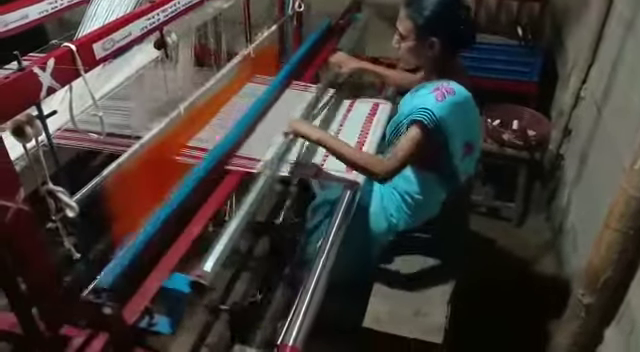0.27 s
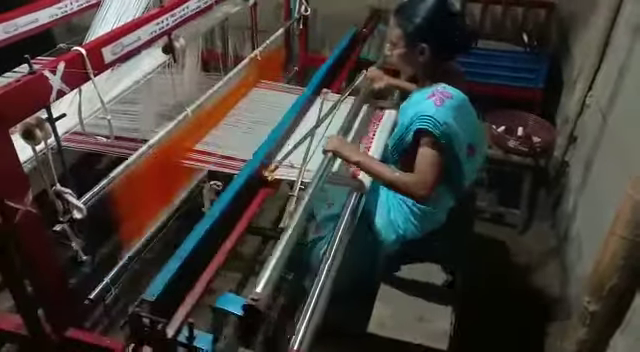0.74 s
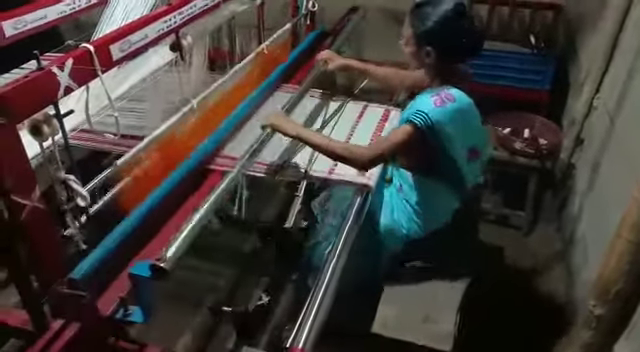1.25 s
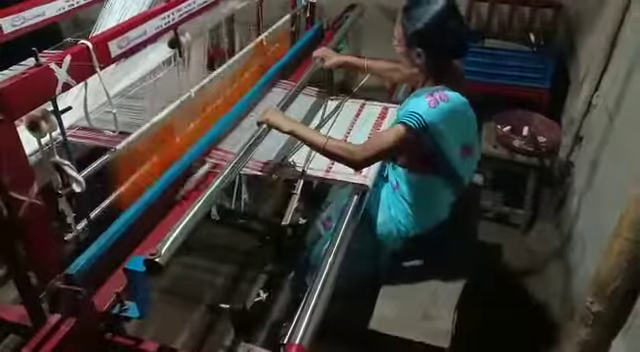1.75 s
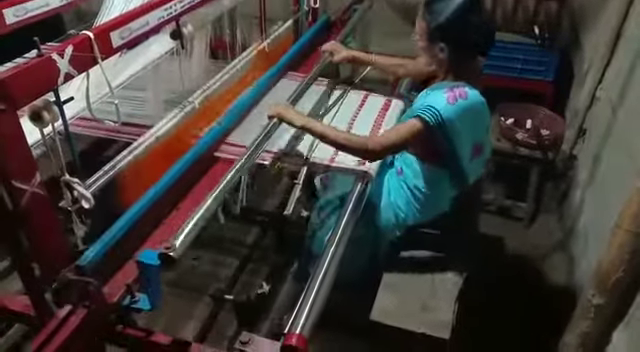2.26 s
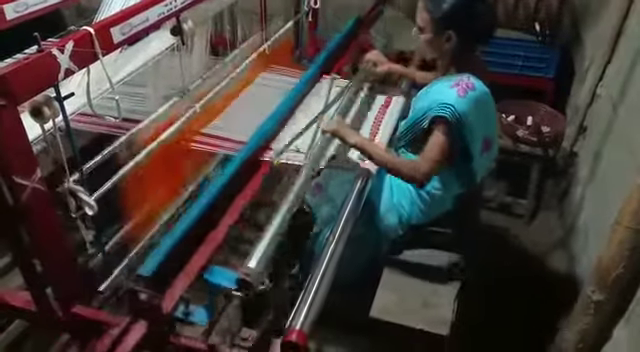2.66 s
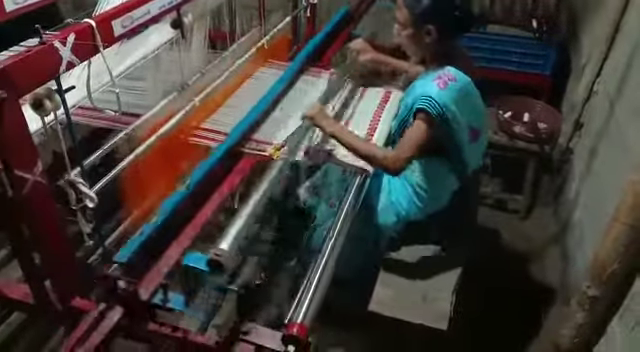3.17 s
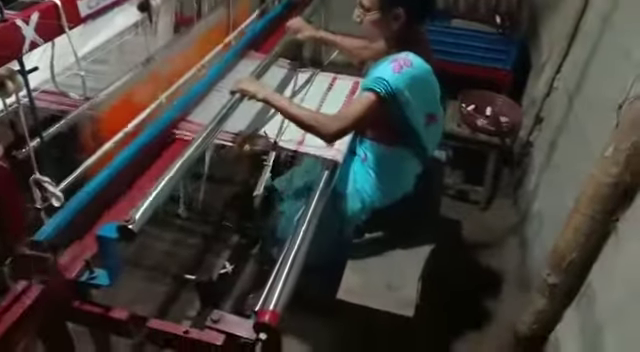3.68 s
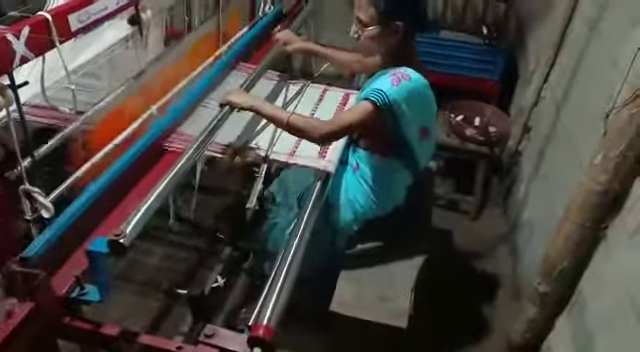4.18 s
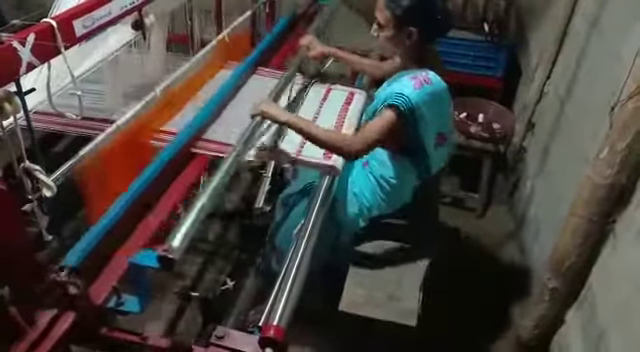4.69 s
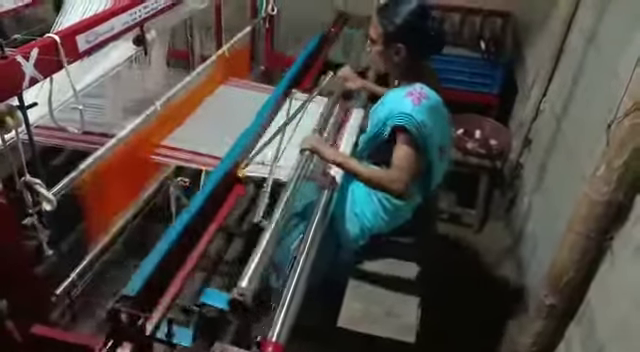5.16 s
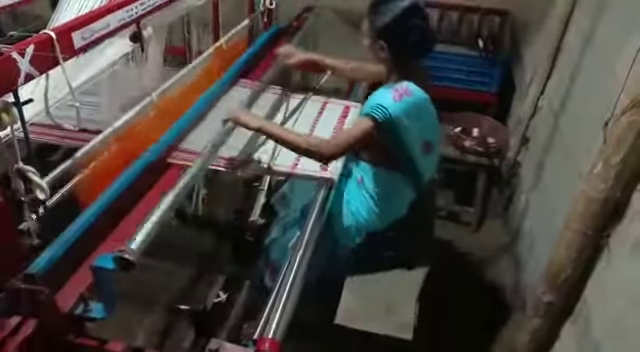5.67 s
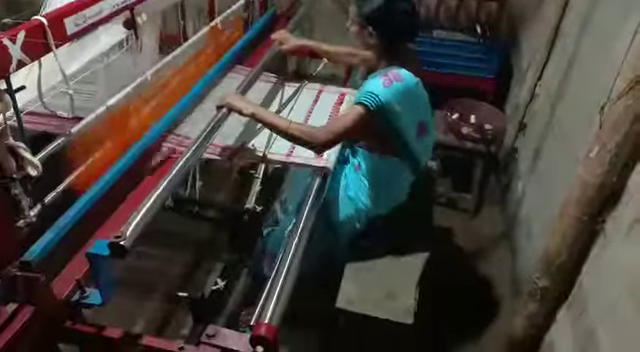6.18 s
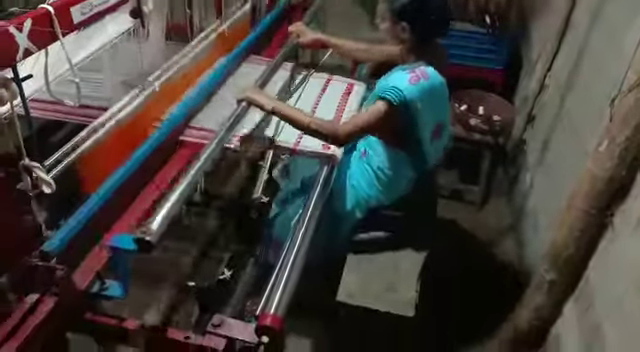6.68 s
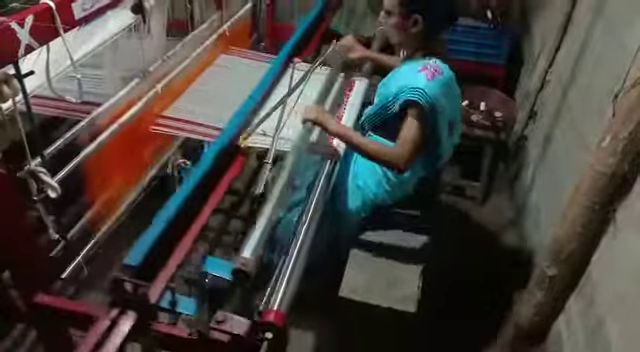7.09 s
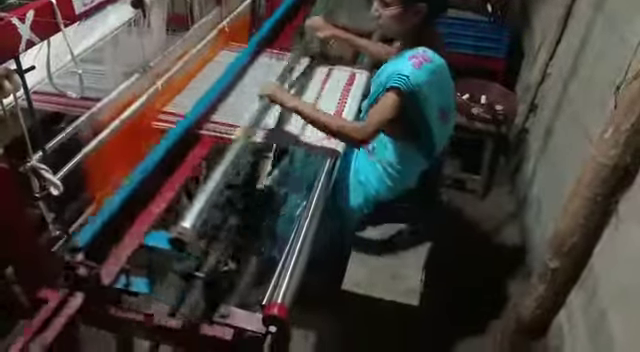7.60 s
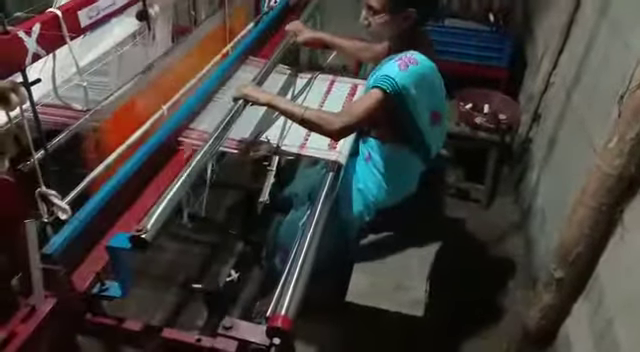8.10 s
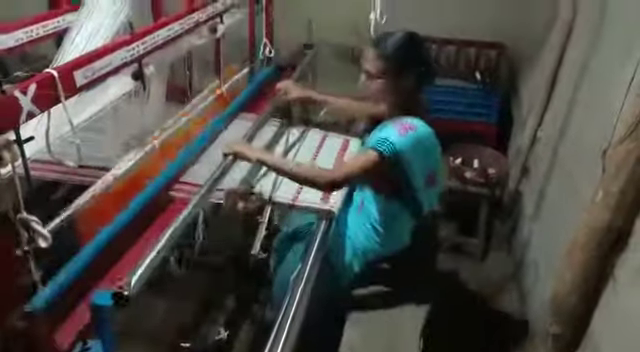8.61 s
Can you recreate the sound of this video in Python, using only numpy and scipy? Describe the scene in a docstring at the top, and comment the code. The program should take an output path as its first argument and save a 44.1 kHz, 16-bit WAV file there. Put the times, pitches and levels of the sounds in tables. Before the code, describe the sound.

A wooden handloom clatters in a hard-walled shed, heavy knocks landing in pairs with jingling metal rattle, over a constant hissing, ringing machinery din.

```python
"""A wooden jacquard handloom works in a hard-walled shed: heavy knocks in pairs, each a burst of rattle over a wood thump.
Between them hooks, rods and shuttle clatter; catches snap, bars clack, rods sing and small weights clink.
Blows are short groups of clicks that drive fading noise and ringing tones.
Behind lies the hissing, ringing din of more machinery, made of filtered noise, and for a while a low rumble.
A close mono microphone with a fast limiter makes the din duck under every loud blow."""
import sys
import numpy as np
from scipy import signal
from scipy.fft import rfft, irfft, next_fast_len
from scipy.io import wavfile
from scipy.ndimage import uniform_filter1d, minimum_filter1d

SR = 44100
rng = np.random.default_rng(int(sys.argv[2]) if len(sys.argv) > 2 else 0)


def waveform_to_disk(signal):
    """Save audio, clipped to [-1, 1], as 16-bit WAV at the path in sys.argv[1]."""
    frames = np.transpose(np.atleast_2d(signal))
    scaled = np.clip(frames, -1, 1) * 32767
    samples = np.round(scaled).astype(np.int16)
    wavfile.write(sys.argv[1], SR, samples)


N = 390285

# In all tables the levels are relative: later gains shift them. t60_s is the time to fade by 60 dB.
# Hiss of the background machinery: pitch_hz, level_db (per Hz)
DIN_HISS = [(20, -38), (42, -35), (70, -17.5), (110, -4), (170, -8.5), (260, -2.5), (440, 2.5), (700, 0.5),
            (1700, 3.5), (2600, 2.5), (4200, 0.5), (7000, 2), (15000, -3.5)]
# Metal resonance in the background: pitch_hz, width_hz (nominal), level_db
DIN_RESONANCES = [(1245.6, 51, 1), (1365, 200, -21), (1170.5, 110, -2.5), (1077, 243, -1)]
# Low rumble that swells for a while: time_s, level_db
RUMBLE_SWELL = [(6.0, -52), (6.074, -40), (6.164, -42), (6.202, -30), (6.236, -39), (6.472, -39.5),
                (6.506, -29.5), (6.732, -29), (6.794, -42), (7.122, -38), (7.676, -47), (7.7, -60)]
# Resonances of the rumble: pitch_hz, width_hz (nominal), level_db
RUMBLE_RESONANCES = [(89, 25, -0.5), (116, 14, -3)]
# Single rods and wires that sing out: start_s, pitch_hz, level_db, t60_s
SINGING_RODS = [(.44, 4760, -18, 0.31), (1.846, 7100, -20, 0.27), (2.055, 4350, -18.5, 0.55),
                (2.318, 4580, -16, .7), (2.365, 7620, -13, 0.46), (4.125, 6210, -6, 0.32),
                (4.136, 6040, -7, 0.32), (4.2, 5650, -17, .6), (4.136, 7000, -12, 0.41),
                (4.41, 4150, -23.5, 1.1), (5.608, 6920, -14, 0.33), (6.41, 3270, -22.5, .4),
                (6.579, 7020, -14, 0.23), (7.298, 7440, -20.5, 0.59), (7.991, 2940, -21, 0.8),
                (8.511, 4170, -23.5, 1), (8.556, 3050, -23, 0.6), (8.726, 4180, -19, 0.61)]
# Hollow clacks of wooden bars: start_s, pitch_hz (centre of a cluster), level_db
WOODEN_BARS = [(1.329, 2690, -19), (2.135, 1910, -17.5), (2.321, 2780, -8), (3.551, 2850, -20),
               (4.607, 2890, -13), (8.81, 4430, -9)]
# Dry snaps of metal catches, which also jolt the hooks: start_s, snap_db, tilt_db_per_octave, jolt_db
CATCH_SNAPS = [(0.582, -4.5, -14, -16.5), (0.743, -20.5, 2, -19.5), (1.269, -13, 0, -14),
               (1.803, -9, -8, -17.5), (2.626, -2.5, -9, -10.5), (3.42, -0.5, -2.5, -18.5),
               (3.456, -2.5, -4, -13), (3.582, -14, -6, -14), (4.363, -5.5, -19, -9.5),
               (5.676, -6.5, 0.5, -12), (7.297, -16, -2, -33), (7.788, -9, -1, -12.5)]
# Loudest blows of hooks, rods and shuttle: start_s, level_db, brightness_db
CLATTER_BLOWS = [(0.002, -4.5, 4.5), (0.095, -14, -2), (0.36, -18, -4), (1.122, -21, 0), (1.326, -23, -9),
                 (1.446, -7, 8), (1.6, -12.5, 7.5), (1.829, -19.5, -9), (1.879, -19.5, -1),
                 (2.039, -19, -8), (2.126, -9, -1), (2.8, -23, -12), (3.54, -13, -4.5), (3.68, -11, 4.5),
                 (4.093, -12.5, 0), (4.125, -7.5, 1.5), (4.2, -21, -4), (4.54, -13, 5), (4.74, -16, -3.5),
                 (4.88, -17.5, 1), (5.603, -11.5, 2), (5.712, -9, 4.5), (6.282, -13, -3), (6.51, -21.5, 12),
                 (6.577, -10.5, 1), (6.664, -13, 1), (6.961, -9.5, 1), (6.99, -15, 5), (7.698, -15, -4.5),
                 (7.819, -11, 4.5), (8.286, -12.5, 1), (8.338, -10, 1), (8.402, -7.5, 3.5),
                 (8.5, -21.5, -5), (8.718, -14.5, 8)]
# Heavy knocks: start_s, clack_db, jingle_db, tick_db, thump_db, hollow_wood_db
HEAVY_KNOCKS = [(1.461, -6, -1, -3, -6.5, -7.5), (2.317, -4, 3, -10, -12.5, -11),
                (3.738, 0, 4, 1.5, -8, 0.5), (4.602, -6.5, -0.5, -9, -17.5, -17),
                (5.901, -6.5, -0.5, -1, -15, -11), (6.746, -4, 4, -10, -19, -21),
                (7.973, 0, 3, 2.5, -5.5, -1), (8.806, -9, -0.5, -6, -16, -16)]
# Three layers of a blow (clack, jingle, tick): low_hz, high_hz, level_db, t60_s (before the tail factor)
BLOW_REGISTERS = [(1600, 5700, 1.5, 0.46), (4250, 8700, 1.5, 0.48), (8400, 13700, 6.5, 0.35)]
# Ringing steel parts: pitch_hz, level_db, t60_s
STEEL_PARTS = [(2780, -17, .15), (3050, 1, 0.2), (4170, 0, 0.52), (4520, -15, .3), (5050, -11, 0.39),
               (5800, -25, .3), (6040, 2, 0.23), (6640, -9, .3), (7300, -10, 0.28), (8570, 1, 0.24),
               (9400, -8, .15)]
# Heavy frame of the loom: pitch_hz, level_db, t60_s
FRAME_MODES = [(90, -36, .12), (125, 0, 0.081), (169, 1.5, 0.059), (223, 2.5, 0.052)]
# Hollow wooden batten: pitch_hz, level_db, t60_s
BATTEN_MODES = [(321, -2, 0.046), (470, -3.5, 0.061), (590, -1.5, 0.043), (767, -3, 0.03), (960, -6, 0.037),
                (1216, -0.5, 0.12)]
# Tone colour of the microphone: pitch_hz, level_db
MICROPHONE_COLOUR = [(4200, 0.5), (5000, -3.5), (6000, -0.5), (6350, 0.5), (6600, -7), (7000, 2), (7550, 1),
                     (8100, -6), (9200, -11), (11000, -19.5), (13700, -24), (14800, -3.5), (15500, -10.5)]
# Faint rattling in each weaving cycle (run-up, between knocks, follow-through):
# after_first_knock_s, length_s, level_db
CYCLE_RATTLES = [(-.33, .3, -24.5), (0.378, .44, -20.5), (1.052, .45, -27)]

PAIR_S = 0.85   # the first run of rattles starts from a knock this long before time zero
CLACK_DB, TICK_DB = -5.5, -9   # relative to the jingle; brightness trades clack for tick
STEEL_UNEVEN_DB = 3.5   # random spread of each steel part's level
CUTOFF_HZ = 15550
TIME = np.arange(N) / SR   # seconds
SIZE = next_fast_len(N + SR)   # transform length, with a second to spare for tails
FREQ = np.maximum(np.arange(SIZE // 2 + 1) * SR / SIZE, 1)   # Hz


def from_db(db):
    """Turn decibels into a gain."""
    return 10 ** (np.asarray(db) / 20)


def rms_one(x):
    """Scale to unit power."""
    return x / np.sqrt(np.mean(x ** 2) + 1e-20)


def spectrum(points):
    """Join (Hz, dB) points into a gain for every frequency."""
    hz, db = np.transpose(points)
    return from_db(np.interp(np.log(FREQ), np.log(hz), db))


def shape(x, gain):
    """Filter a sound by a gain for every frequency."""
    return irfft(rfft(x, SIZE) * gain, SIZE)[:N]


def low_cut(x):
    """Little is radiated below the frame's lowest mode."""
    return signal.sosfilt(signal.butter(4, 68, "high", fs=SR, output="sos"), x)


def drift(rate_hz):
    """Smooth random wandering around 0 with a spread of 1; a higher rate wanders faster."""
    step = 40   # work on every 40th sample, then fill in between
    r = np.exp(-2 * np.pi * rate_hz * step / SR)
    noise = rng.standard_normal(N // step + 2002)
    slow = signal.lfilter([1], [1, -2 * r, r * r], noise)[2000:]   # skip the start-up
    return np.interp(np.arange(N) / step, np.arange(len(slow)), rms_one(slow))


def fade(t, t60):
    """Ringing dies away by 60 dB in t60 seconds."""
    return np.exp(-np.log(1000) * t / t60)


def ring(click_train, hz, t60):
    """A unit click sets a fading sine of height 1 ringing."""
    r = fade(1 / SR, t60)
    w = 2 * np.pi * hz / SR
    return signal.lfilter([0, np.sin(w)], [1, -2 * r * np.cos(w), r * r], click_train + 1e-18)


def resonate(x, modes):
    """Parallel resonances, each applied twice for steep skirts, give unit power."""
    out = 0
    for hz, width_hz, db in modes:
        b, a = signal.iirpeak(hz, hz / (1.77 * width_hz), fs=SR)
        once = signal.lfilter(b, a, x)
        out = out + from_db(db) * rms_one(signal.lfilter(b, a, once))
    return rms_one(out)


def bounces(times, spread_s, fade_db, count):
    """A blow is a first contact and fading rebounds: sample positions and strengths of unit energy."""
    when, size, sign = np.moveaxis(rng.random((len(times), 3, count)), 1, 0)
    is_rebound = np.arange(count) > 0
    late = (np.arange(count) + when - .5) / count * is_rebound   # 0 to 1 across the spread
    strength = from_db(-fade_db * late) * (.5 + size) * np.sign(sign - .5)
    at = np.clip((times[:, None] + spread_s * late) * SR, 0, N - 1).astype(int)
    return at, strength / np.linalg.norm(strength, axis=1, keepdims=True)


def clicks(contacts, level_db):
    """Place the contacts as a click train, with one level for each blow."""
    at, strength = contacts
    heights = strength * from_db(level_db)[:, None]
    return np.bincount(at.ravel(), heights.ravel(), N)


def room_response(t60, crack_db, crack_t60):
    """One contact gives a short noisy crack, then the diffuse tail of the room (as a spectrum)."""
    t = TIME[:SR]
    envelope = np.hypot(fade(t, t60), from_db(crack_db) * fade(t, crack_t60))
    return rfft(rng.standard_normal(SR) * envelope, SIZE)


def blows(rows, contacts, crack_db, crack_t60, tail, steel_db):
    """Contacts sound in three registers and ring the steel parts, with uneven strength each time."""
    out = 0
    for k, (low_hz, high_hz, db, t60) in enumerate(BLOW_REGISTERS):
        band = rms_one(((1 + (low_hz / FREQ) ** 8) * (1 + (FREQ / high_hz) ** 12)) ** -.5)
        response = band * room_response(t60 * tail, crack_db, crack_t60)
        out = out + shape(clicks(contacts, rows[:, k + 1] + db), response)
    # besides the large parts, many small hooks and wires ring at pitches of their own
    hooks = [(hz, -3, .079) for hz in rng.uniform(1758, 8500, size=40)]
    for hz, db, t60 in STEEL_PARTS + hooks:
        uneven_db = STEEL_UNEVEN_DB * rng.standard_normal(len(rows))
        jingle_db = rows[:, 2]
        out = out + ring(clicks(contacts, jingle_db + steel_db + db + uneven_db), hz, t60)
    return out


def machinery():
    """Countless distant impacts merge into a hiss and keep a metal resonance ringing."""
    impacts = rng.standard_normal(N) * from_db(0.95 * drift(27))
    hiss = rms_one(shape(impacts, spectrum(DIN_HISS)))
    drive = rng.standard_normal(N) * from_db(1.1 * drift(22))
    ringing = resonate(drive, DIN_RESONANCES)
    return from_db(-20) * hiss + from_db(-26.5 + 1.4 * drift(2.8)) * ringing


def rumble():
    """Resonant low noise swells unevenly and dies away."""
    times, levels = np.transpose(RUMBLE_SWELL)
    level_db = np.interp(TIME, times, levels) + drift(9.4)   # lumps of about 1 dB
    switched_on = 1.0 * ((TIME > times[0]) & (TIME < times[-1]))
    present = uniform_filter1d(switched_on, size=4000)   # soft edges
    return low_cut(present * from_db(level_db) * resonate(rng.standard_normal(N), RUMBLE_RESONANCES))


def loose_weights(rows, per_s=150, settle_s=0.1, ring_t60=0.055, size_db=3.0, level_db=-6.0):
    """Each blow shakes the small hanging heddle weights, which clink together until they settle."""
    s, _, jingle_db, _ = np.transpose(rows)
    kicks = np.bincount(np.clip(s * SR, 0, N - 1).astype(int), from_db(jingle_db) ** 2, N)
    # the kicks add up as energy; the root turns it back into strength
    shaking = np.sqrt(signal.lfilter([1], [1, -np.exp(-2 / (settle_s * SR))], kicks + 1e-12))
    sizes = from_db(size_db * (np.minimum(rng.exponential(1, N), 3) - 1))
    touches = (rng.random(N) < per_s / SR) * sizes * shaking
    pitches = np.geomspace(2400, 9500, 32)
    dealt = rng.integers(0, len(pitches), N)   # a random pitch for each touch
    clinks = sum(ring(touches * (dealt == k), hz, ring_t60) for k, hz in enumerate(pitches))
    return from_db(level_db) * clinks


def singing(rise_s=0.0029, waver=0.0033, flutter_db=3.0):
    """A shaken rod swells into one tone and dies away, wavering as it chatters in its seat."""
    out = np.zeros(N)
    bend = drift(31)
    flutter = from_db(flutter_db * drift(37))
    for s, hz, db, t60 in SINGING_RODS:
        start = int(s * SR)
        span = slice(start, min(start + SR, N))
        t = TIME[:span.stop - span.start]
        phase = 2 * np.pi * np.cumsum(hz * (1 + waver * bend[span])) / SR
        swell = 1 - np.exp(-t / rise_s)
        out[span] += from_db(db) * swell * fade(t, t60) * np.sin(phase)
    return flutter * out


def bars(t60=0.27, spread=0.04):
    """A struck bar rings briefly in a cluster of close modes."""
    out = np.zeros(N)
    t = TIME[:SR // 2]
    for s, hz, db in WOODEN_BARS:
        modes = hz * (1 + spread * rng.standard_normal((8, 1)))
        tone = rms_one(np.sin(2 * np.pi * (modes * t + rng.random((8, 1)))).sum(0))
        at = int(s * SR)
        out[at:at + len(t)] += (from_db(db) * tone * fade(t, t60))[:N - at]
    return out


def snaps():
    """A catch springs shut close by: a tight, bright burst of contacts that is soon over."""
    bright = rms_one(spectrum([(1000, -40), (2600, -25), (6000, 2.5), (9000, 5), (15000, 6)]))
    response = bright * room_response(t60=0.058, crack_db=5.0, crack_t60=0.0059)
    octaves = np.log2(np.maximum(FREQ, 2500) / 6000)   # the tilt pivots at 6000 Hz
    out = 0
    for s, db, tilt_db, _ in CATCH_SNAPS:
        contacts = bounces(np.array([s]), spread_s=.014, fade_db=15, count=4)
        out = out + shape(clicks(contacts, [db]), response * from_db(tilt_db * octaves))
    return from_db(8) * out


def rattles(count):
    """Each phase of the weaving cycle scatters faint blows: rows of start_s, level_db, brightness_db."""
    cycles = [-PAIR_S] + [knock[0] for knock in HEAVY_KNOCKS[::2]]
    rows = []
    for first in cycles:
        for after_s, length_s, db in CYCLE_RATTLES:
            times = first + after_s + length_s * (np.arange(count) + rng.random(count)) / count
            rows += [(s, db, 0) for s in times]
    return [row for row in rows if 0 < row[0] < N / SR]


def light_blows():
    """Gather loud blows, catch jolts and faint rattles: rows of start_s, clack_db, jingle_db, tick_db."""
    jolts = [(s, jolt_db, 0) for s, _, _, jolt_db in CATCH_SNAPS]
    s, db, bright_db = np.transpose(CLATTER_BLOWS + jolts + rattles(count=5))
    return np.transpose([s, db + CLACK_DB - bright_db, db, db + TICK_DB + bright_db])


def clatter(rows):
    """Hooks and rods drop and rebound as the opening between the threads changes."""
    contacts = bounces(rows[:, 0], spread_s=.022, fade_db=3.5, count=5)
    return from_db(-2.0) * blows(rows, contacts, crack_db=2.5, crack_t60=0.053, tail=0.94, steel_db=-19)


def knocks():
    """The batten slams home: everything on it rattles, and the wood thumps below."""
    rows = np.array(HEAVY_KNOCKS)
    contacts = bounces(rows[:, 0], spread_s=.028, fade_db=4, count=9)
    rattle = blows(rows, contacts, crack_db=7, crack_t60=0.046, tail=0.8, steel_db=-18)
    # the wood answers about 4 ms later
    heavy = bounces(rows[:, 0] + 0.00398, spread_s=.03, fade_db=5.0, count=4)
    thump = sum(ring(clicks(heavy, rows[:, 4] + db), hz, t60) for hz, db, t60 in FRAME_MODES)
    hollow = 0
    for k, (hz, db, t60) in enumerate(BATTEN_MODES):
        hollow = hollow + (-1) ** k * ring(clicks(heavy, rows[:, 5] + db), hz, t60)   # signs alternate
    return from_db(-1.0) * rattle + from_db(4.0) * low_cut(thump + hollow)


def scene():
    """Add the din behind and the loom in front; both channels are alike."""
    light = light_blows()
    background = machinery() + rumble()
    loom = loose_weights(light) + singing() + bars() + snaps() + clatter(light) + knocks()
    return np.tile(background + loom, (2, 1))


def loudness(x, edge=0.65, peak_share=0.5, crest_db=9.0):
    """What the limiter senses: a treble-weighted blend of power and peak level, in dB."""
    power = (x + edge * np.diff(x, prepend=0)) ** 2 + 1e-9
    mean_db = 10 * np.log10(uniform_filter1d(power, size=600))
    peak_db = 10 * np.log10(-minimum_filter1d(-power, size=600)) - crest_db
    return mean_db + peak_share * (peak_db - mean_db) - 3.5


def limiter(x, threshold_db, slope, ahead_s, hold_s, release_db, attack_s):
    """The gain starts to drop just before a loud sound, holds, and recovers by release_db a second."""
    ahead_db = np.interp(TIME + ahead_s, TIME, loudness(x))
    cut = slope * np.maximum(ahead_db - threshold_db, 0)
    half = max(int(hold_s * SR / 2), 1)
    cut = -minimum_filter1d(-cut, 2 * half + 1, origin=half)   # hold the deepest recent cut
    cut = np.maximum.accumulate(cut + release_db * TIME) - release_db * TIME
    r = np.exp(-1 / (attack_s * SR))
    smooth_cut = signal.lfilter([1 - r], [1, -r], cut)
    return x * from_db(-smooth_cut)


def record(dry):
    """Apply microphone colour, limiter, rounded peaks and a steep top cut."""
    x = shape(dry[0], spectrum(MICROPHONE_COLOUR))
    x = limiter(x, threshold_db=-18, slope=0.69, ahead_s=0.0079, hold_s=0.03, release_db=130, attack_s=0.0043)
    x = 1.063 * np.tanh(x / 1.146)
    top_cut = 1 / (1 + np.exp(np.clip((FREQ - CUTOFF_HZ) / 25, -50, 50)))
    return np.tile(shape(x, top_cut), (2, 1))


dry = scene()
out = record(dry)
waveform_to_disk(out)
```